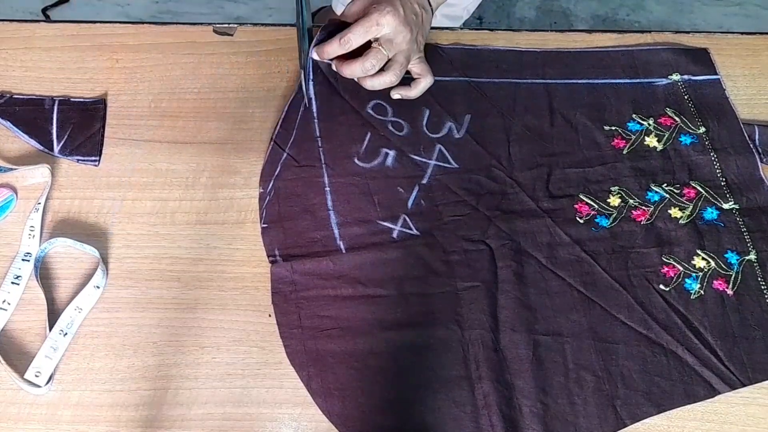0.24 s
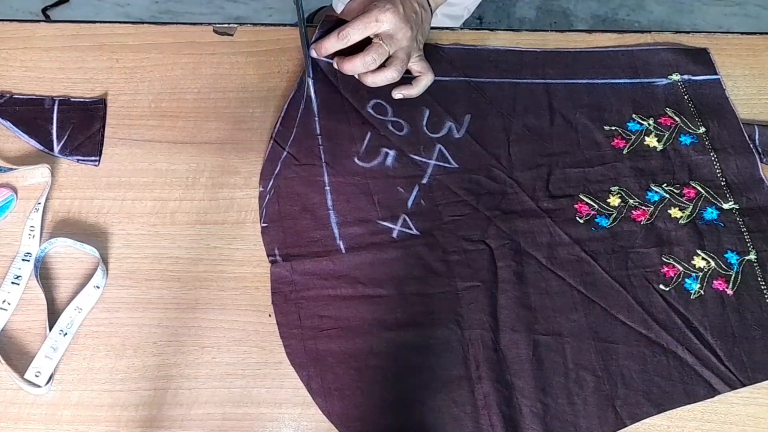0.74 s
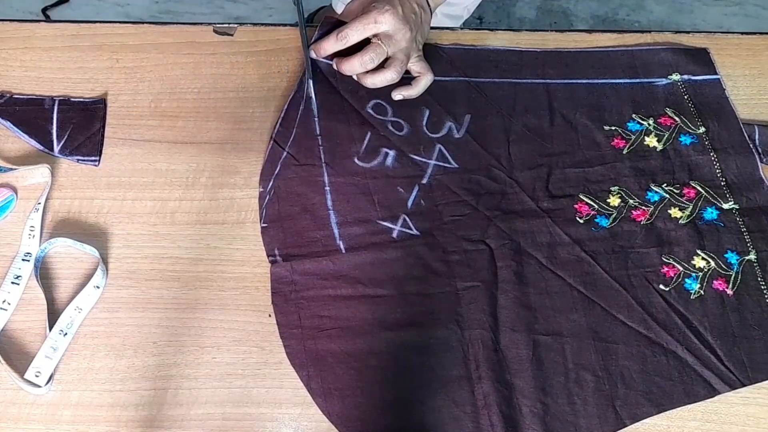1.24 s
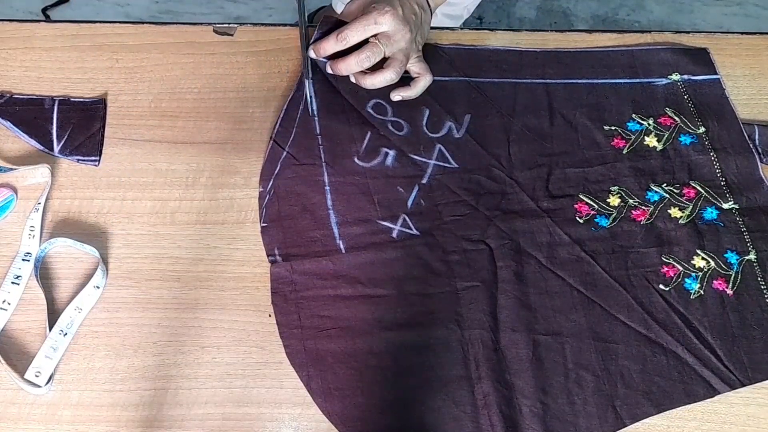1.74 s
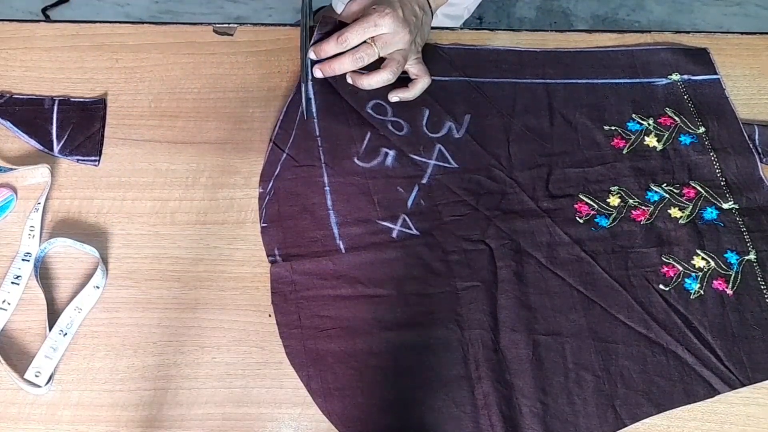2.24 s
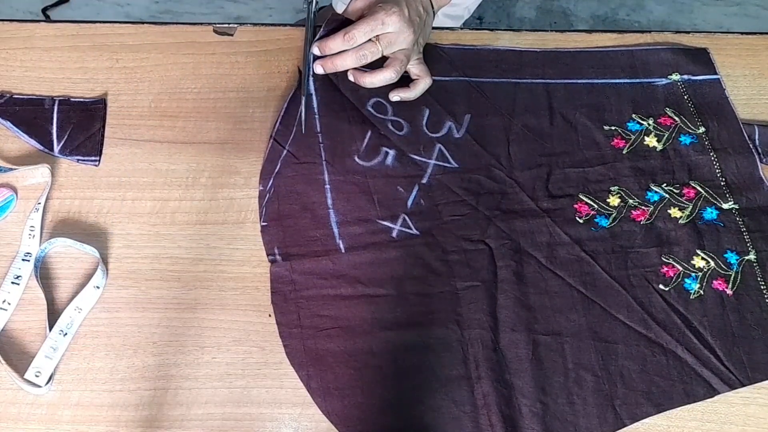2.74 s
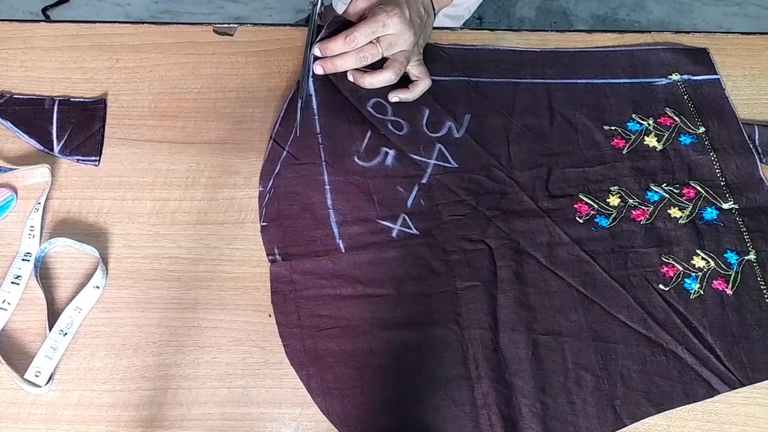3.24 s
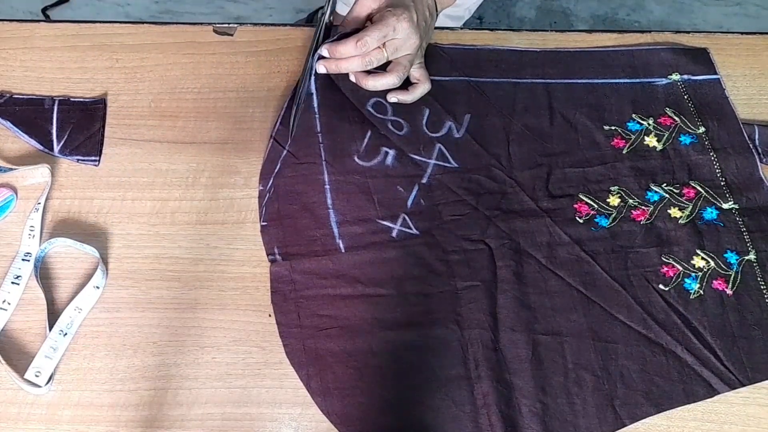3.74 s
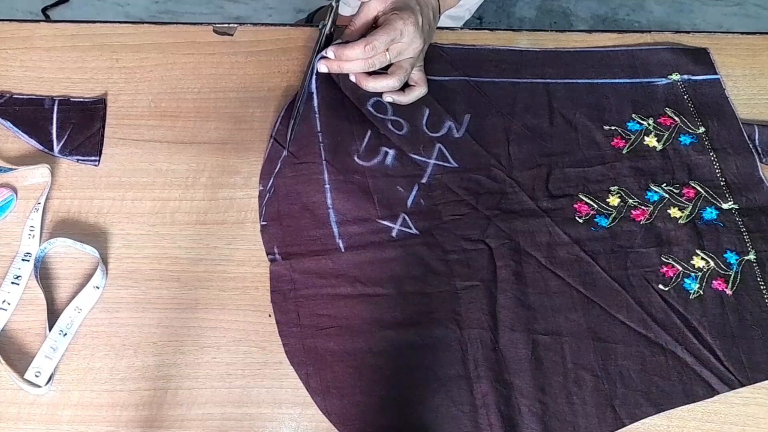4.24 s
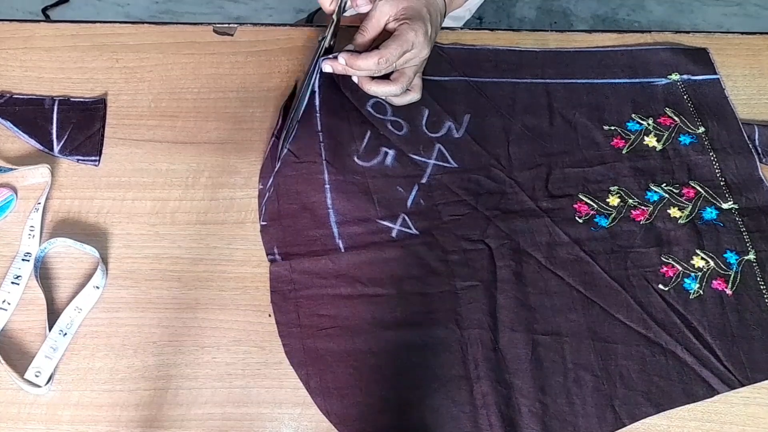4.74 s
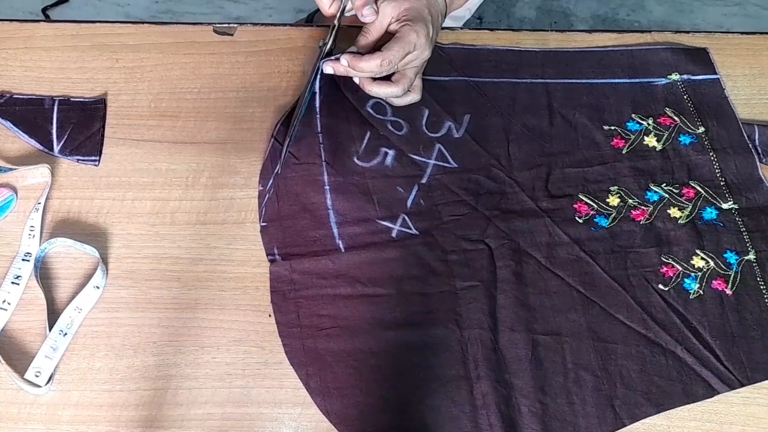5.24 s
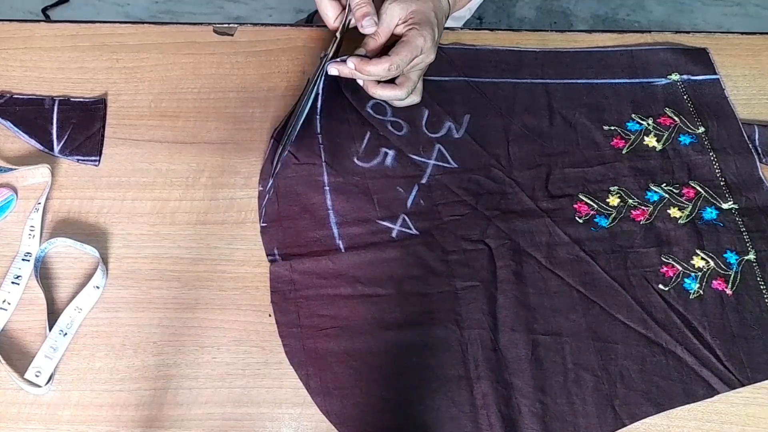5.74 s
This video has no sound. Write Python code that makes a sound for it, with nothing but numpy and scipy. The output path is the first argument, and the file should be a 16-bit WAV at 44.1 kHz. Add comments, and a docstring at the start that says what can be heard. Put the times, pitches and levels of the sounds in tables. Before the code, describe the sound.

A clatter on a wooden table dies away, then large tailor's scissors crunch through cloth in slow strokes, scraping and knocking the tabletop in a quiet room.

```python
"""A clatter on a wooden table dies away into room rumble, hum and hiss; a small bird chirps far off
and a clock ticks. Then large tailor's scissors cut cloth, the lower blade sliding on the table.
Clatter and hiss are shaped noise, the bird gliding sines, the clock paired noise bursts.
Each cut snaps a run of threads: random pulses drive resonances, so the table booms and the steel sizzles.
Between cuts the scissors reopen and scrape forward; knocks, bites and singing edges add the detail."""
import sys
import numpy as np
from scipy import signal
from scipy.fft import rfft, irfft
from scipy.io import wavfile
from scipy.ndimage import uniform_filter1d

SR = 44100
rng = np.random.default_rng(int(sys.argv[2]) if len(sys.argv) > 2 else 0)


def to_wav(sig):
    """Store sig (one row per channel, or 1-D mono) as 16-bit WAV at the path in sys.argv[1].

    Samples outside -1..1 are clipped; the rate is SR.
    """
    pcm = np.clip(np.atleast_2d(sig), -1, 1) * 32767
    pcm = np.round(pcm).astype(np.int16)
    wavfile.write(sys.argv[1], SR, pcm.T)  # frames by channels


N = 263718
TIME = np.arange(N) / SR

# All levels in the tables are relative: the sounds' own level settings still shift them.
# dying clatter on the table: (f/Hz, level/dB per Hz)
CLATTER_SPECTRUM = [(24, -47), (40, -33), (64, 0), (177, -11), (239, -5), (338, -10.5), (373, 2),
                    (478, -12.5), (627, -8), (845, -14.5), (1000, -10.5), (1290, -18.5), (1730, -17.5),
                    (2990, -29.5), (15000, -55)]
# room rumble and hiss: (f/Hz, level/dB per Hz)
HISS_SPECTRUM = [(12, -51), (20, -23), (53, -6.5), (95, -6.5), (119, -11), (149, -1), (197, -20.5),
                 (365, -14.5), (570, -23), (1650, -31), (3310, -39.5), (4500, -40), (5030, -39.5),
                 (11300, -36), (15800, -31)]
# steady hum in the room: (f/Hz, level/dB)
HUM_TONES = [(64.6, -87), (145.3, -75.5), (344.5, -88)]
# the bird's calls: (t/s, level/dB)
BIRD_CALLS = [(0.162, -57.5), (3.182, -59), (3.469, -55), (3.768, -57), (4.05, -56.5), (4.351, -54.5),
              (4.655, -58)]
# notes of every call: (t/s from its start, length/s, first f/Hz, last f/Hz, level/dB)
BIRD_NOTES = [(0, 0.035, 3820, 4070, -3.5), (0.028, .055, 5390, 5100, -0.5),
              (0.078, 0.038, 3673, 4230, -0.5), (0.11, 0.034, 4286, 4640, 0.5)]
# the clock's steps: (t/s, level/dB)
CLOCK_STEPS = [(0.767, -67), (1.765, -64), (2.736, -65), (3.739, -60.5), (4.746, -64), (5.74, -62)]
# colour of one click: (f/Hz, level/dB per Hz)
CLICK_SPECTRUM = [(1200, 6.5), (2400, 8), (3300, -3.5), (4500, 0), (6000, 1.5), (7100, 8), (8500, -15),
                  (12000, -10)]
# the scissors reopen and slide on: (t/s, length/s, rub of the cloth level/dB,
# lean on the table level/dB, rub of the edges level/dB)
SLIDES = [(1.095, 0.081, -58.5, 1, -99), (1.179, 0.14, -54.5, -6.5, -87), (1.42, 0.14, -49, -7.5, -71),
          (1.571, 0.14, -60, -4.5, -85), (1.8, 0.073, -58.5, 4, -78), (2.238, 0.062, -46, -4.5, -66),
          (2.38, 0.12, -50, 4.5, -73), (2.858, 0.14, -65, 6, -98), (3.085, 0.077, -58.5, -1, -74),
          (3.15, 0.053, -47.5, -12, -79), (3.653, 0.11, -50, 6, -70), (4.045, 0.11, -51.5, -3, -67),
          (4.445, 0.087, -56, 13.5, -80), (4.58, 0.11, -50, 3.5, -66.5), (5.101, 0.13, -48, 3, -67),
          (5.573, 0.1, -53.5, 8.5, -69), (5.945, .06, -65.5, 18, -88)]
# the blades close through the cloth: (t/s, length/s, starting force level/dB, swell/dB,
# lean on the table level/dB, keenness of the edges level/dB)
CUTS = [(1.68, 0.11, -45, 1.5, -3, -3.5), (1.886, 0.059, -42.5, -3.5, -0.5, -3.5),
        (2.008, 0.24, -40.5, 3, -2.5, 0), (3.229, 0.31, -44.5, 8.5, 0, 0.5), (4.156, 0.28, -41.5, 6, 3, 3),
        (5.208, 0.2, -40.5, 4, 2.5, 3.5)]
# further knocks of the blade on the table: (t/s, level/dB, favoured f/Hz)
KNOCKS = [(2.948, -43.5, 99), (3.307, -27.5, 1238), (3.487, -22, 424), (3.546, -26, 112), (4.383, -23, 370),
          (4.423, -17, 380), (4.432, -28, 97.6), (4.602, -33, 701), (5.113, -33.5, 535), (5.285, -23, 1100),
          (5.299, -24.5, 123), (5.376, -19, 388), (5.584, -44, 520)]
# the edges catch and bite: (t/s, level/dB, f/Hz at which the blades ring most)
BITES = [(1.701, -51, 6640), (1.894, -45, 14600), (2.021, -42.5, 13500), (2.068, -47, 14000),
         (2.123, -40, 12000), (2.208, -40, 14400), (2.2286, -37.5, 5500), (3.266, -44, 5420),
         (3.3109, -44, 14000), (3.3952, -41.5, 9750), (3.4456, -38.5, 9770), (3.486, -33.5, 5530),
         (4.1966, -43, 14420), (4.2192, -39, 12460), (4.287, -34.5, 12600), (4.3572, -41, 5520),
         (4.4229, -32.5, 5400), (5.115, -51.5, 6400), (5.153, -49, 13900), (5.2222, -41.5, 13400),
         (5.274, -34.5, 15000), (5.2974, -31.5, 14800), (5.3732, -33, 13800)]
# the blades rub steel on steel as they shut: (t/s, length/s, level/dB)
CLOSINGS = [(2.113, 0.18, -56.5), (3.476, 0.12, -58), (4.376, 0.068, -53.5), (5.366, 0.037, -50.5)]
# clear modes of the table top: (f/Hz, level/dB)
TABLE_MODES = [(113.0, -39), (199.2, -84), (242.2, -49), (328.4, -45.5), (376.8, -36), (511.4, -43),
               (646.0, -58), (812.9, -47), (861.3, -46), (915.2, -50), (1001, -78), (1136, -45.5),
               (1233, -58), (1389, -93), (1572, -90)]
# dense modes of the table top: (f/Hz, level/dB per Hz)
WOOD_SPECTRUM = [(40, -25), (75, 0.5), (110, 4.5), (150, -2), (195, -30.5), (245, -2.5), (290, -17.5),
                 (380, -10), (520, -3), (600, -12.5), (820, -8.5), (1250, -6), (1640, -20.5), (1870, -37),
                 (5000, -49)]
# dense modes of the blades: (f/Hz, level/dB per Hz)
STEEL_SPECTRUM = [(2200, -41), (3200, -12), (4000, -17), (4800, -1), (6500, 4), (7500, 0.5), (8400, -32),
                  (9800, -6), (11500, 4.5), (13800, 6.5), (15000, 6), (15800, -2.5)]
# clear modes of the blades: (f/Hz, width/Hz before stroke() broadens it, level/dB)
BLADE_MODES = [(5530, 50, 6), (5900, 33, -3), (6450, 28, 7.5), (9750, 280, 4), (10330, 210, 7),
               (12900, 52, -24), (12900, 51, -11), (14200, 790, -15), (14900, 86, -33.5)]
# modes of the shut blades: (f/Hz, width/Hz, level/dB)
SHUT_MODES = [(5540, 70, 6), (5710, 89, -0.5), (7360, 370, -4.5), (10800, 200, -3.5), (14100, 370, -1)]
# tearing fibres: (f/Hz, level/dB per Hz)
FIBRE_SPECTRUM = [(1100, -6.5), (1550, 7), (2100, 0), (2700, -5), (3200, -8.5), (3900, -21.5),
                  (6000, -22.5)]
# reverberation of the room: (f/Hz, decay by 60 dB t/s)
ROOM_DECAY = [(100, 0.59), (400, 0.57), (1200, 0.47), (4500, 0.58), (8000, 0.42), (15000, 0.39)]
# likeness of left and right, wide around 3 to 5 kHz, nearly mono above 7 kHz: (f/Hz, likeness from -1 to 1)
LIKENESS = [(30, .5), (70, .9), (150, .94), (300, .87), (640, .68), (1400, .38), (3100, .2), (5300, .25),
            (7000, .8), (10000, .9), (15000, .9)]
# likeness of left and right in the background, wide below 5 kHz, nearly mono in the treble:
# (f/Hz, likeness from -1 to 1)
BACKGROUND_LIKENESS = [(30, .4), (120, .45), (300, .15), (1000, 0), (5000, 0), (7000, .6), (9000, .95),
                       (15000, .97)]
# phase by which left leads right: (f/Hz, phase/rad)
LEFT_LEAD = [(0, .1), (1200, .2), (2500, .4), (4500, 1.2), (6400, 0), (15500, 0)]

# during a cut, levels against the crunch: (dB at the start, dB at the end)
CUT_SCRAPE_DB, CUT_WEIGHT_DB, CUT_SIZZLE_DB = (-5, 0.5), (-4.5, 0), (-20, -15.5)
CUT_ATTACK_S, CUT_RELEASE_S = 0.026, 0.019
SLIDE_ATTACK_S, SLIDE_RELEASE_S = 0.038, 0.033


def amp(db):
    """Decibels to gain."""
    return 10 ** (np.asarray(db) / 20)


def evened(x):
    """Scales to rms 1."""
    return x / np.sqrt(np.mean(x ** 2) + 1e-20)


def unit(h):
    """Scales a response to a mean energy of 1 per channel."""
    return evened(h) / np.sqrt(h.shape[-1])


def read(points, hz):
    """Reads a table on a log-frequency axis."""
    f, value = np.transpose(points)
    return np.interp(np.log(hz + 1), np.log(f + 1), value)


def add(mix, s, sound):
    """Mixes a sound in at time s."""
    part = mix[..., max(round(s * SR), 0):][..., :sound.shape[-1]]
    part += sound[..., :part.shape[-1]]


def through(x, response):
    """Sends a sound through a response by convolution."""
    return signal.fftconvolve(np.atleast_2d(x), response, axes=1)[:, :N]


def band(x, hz, kind, order=2):
    """Butterworth filter."""
    return signal.sosfilt(signal.butter(order, hz, kind, fs=SR, output="sos"), x)


def noise_pair(spectrum, size, likeness=LIKENESS):
    """Coloured stereo noise of rms 1."""
    hz = np.fft.rfftfreq(size, 1 / SR)
    left, other = rfft(rng.standard_normal((2, size)))
    same = np.clip(read(likeness, hz), -1, 1)
    right = same * left + np.sqrt(1 - same ** 2) * other
    right = right * np.exp(-1j * read(LEFT_LEAD, hz))
    return evened(irfft(np.array([left, right]) * amp(read(spectrum, hz)), size))


def burst(spectrum, t60, size=16384):
    """A dying burst of dense, unresolved modes whose strengths follow the spectrum."""
    decay = amp(-60 * np.arange(size) / SR / t60)
    z = rfft(noise_pair([(20, 0), (20000, 0)], size) * decay)
    # level the broad colour of the noise, but keep its fine grain of modes
    grain_bins = max(int(4 / t60 * size / SR), 3)
    local = np.sqrt(uniform_filter1d((abs(z) ** 2).mean(0), size=grain_bins))
    z *= amp(read(spectrum, np.fft.rfftfreq(size, 1 / SR))) / local
    fade_out = np.minimum(np.linspace(2, 0, size), 1) ** 4
    return unit(irfft(z) * fade_out)


def ring(modes, size=16384):
    """Damped sines from rows (f/Hz, width/Hz, level/dB), out of step where left and right are unlike."""
    t, out = np.arange(size) / SR, np.zeros((2, size))
    for k, (hz, width, db) in enumerate(modes):
        lag = (-1) ** k * np.arccos(np.clip(read(LIKENESS, hz), -1, 1))
        sine = np.sin(2 * np.pi * hz * t - np.array([[0], [lag]]))
        out += amp(db) * unit(sine * np.exp(-np.pi * width * t))
    return unit(out)


def room(x, build_s=0.0009):
    """A dense noise tail in which each band dies at its own speed."""
    noise = noise_pair([(20, 0.0054), (20000, 0)], SR)
    hz, t, z = signal.stft(noise, SR, nperseg=256)
    decay = amp(-60 * t / read(ROOM_DECAY, hz)[:, None])
    tail = signal.istft(z * decay * (1 - np.exp(-t / build_s)), SR, nperseg=256)[1]
    return through(x, unit(tail))


def clatter(level_db=-26.5, t60=0.41):
    """The last of a clatter on the table: shaped noise that dies away exponentially."""
    ease_in = np.minimum(TIME / 0.002, 1)
    return ease_in * amp(level_db - 60 * TIME / t60) * noise_pair(CLATTER_SPECTRUM, N)


def background(hum_db=-1, hiss_db=-62, waver_hz=7):
    """Room rumble and fine hiss as shaped noise, with hum tones that waver in level and phase."""
    def waver():
        return evened(band(rng.standard_normal(N), waver_hz, "low"))

    hum = np.zeros(N)
    for hz, db in HUM_TONES:
        swell = 1 + 0.22 * waver()
        hum += amp(db) * swell * evened(np.sin(2 * np.pi * hz * TIME + 1.5 * waver()))
    return amp(hum_db) * hum + amp(hiss_db) * noise_pair(HISS_SPECTRUM, N, BACKGROUND_LIKENESS)


def bird(level_db=-3, stray=0.0102, warble=0.037, warble_hz=280):
    """Thin whistled notes: gliding sines, unevenly detuned and warbled, heard only as reverberation."""
    out = np.zeros(N)
    for start, db in BIRD_CALLS:
        for delay, length, first_hz, last_hz, note_db in BIRD_NOTES:
            size = round(length * SR)
            waver = evened(band(rng.standard_normal(SR), warble_hz, "low"))[:size]
            # stray and warble are shares of the pitch
            bend = 1 + stray * rng.standard_normal() + warble * waver
            hz = np.linspace(first_hz, last_hz, size) * bend
            whistle = np.sin(2 * np.pi * np.cumsum(hz) / SR)
            note = evened(whistle * signal.windows.tukey(size, 0.5))
            add(out, start + delay, amp(db + level_db + note_db) * note)
    return room(out)


def clock(second_click_s=0.04, level_db=-2, first_db=-3, direct_db=-12):
    """Each step of a distant clock is a soft double click, mostly reverberation."""
    out = np.zeros((2, N))
    for s, db in CLOCK_STEPS:
        for delay, click_db in ((0, first_db), (second_click_s, 0)):
            click = evened(burst(CLICK_SPECTRUM, 0.025, size=2048))
            add(out, s + delay, amp(db + level_db + click_db) * click)
    return amp(direct_db) * out + room(out)


def threads(size, per_s=620, spread_db=3.5, rub=0.45):
    """Threads part one by one in uneven snaps over a little smooth rubbing."""
    rate = per_s * rng.exponential(1, size // 64 + 1).repeat(64)[:size]
    count = np.cumsum(rate) / SR
    snaps = np.diff(np.floor(count), prepend=0)
    snaps = snaps * amp(spread_db * rng.standard_normal(size)) * rng.choice([-1, 1], size)
    force = evened(snaps) + rub * rng.standard_normal(size)
    # the hand keeps the effort steady
    return force / np.sqrt(uniform_filter1d(force ** 2, size=1100) + 1e-9)


def table_top(width_hz=18, modes_db=-4, dense_t60=0.066, spot_db=-0.9):
    """The wooden top's answer to a tap: clear modes among dense ones, varied at random for each spot."""
    modes = [(hz, width_hz + hz / 50, db + spot_db * rng.standard_normal()) for hz, db in TABLE_MODES]
    return unit(amp(modes_db) * ring(modes) + burst(WOOD_SPECTRUM, dense_t60))


def push(start, length, attack_s, release_s):
    """One push of the hand: progress from 0 to 1, and an envelope that eases in, holds and dies away."""
    t = np.arange(0, min(length + 6 * release_s, N / SR - start), 1 / SR)
    attack = np.sin(np.pi / 2 * np.minimum(t / attack_s, 1)) ** 2
    return np.minimum(t / length, 1), attack * np.exp(-np.maximum(t - length, 0) / release_s)


def stroke(crunch, scrape, sizzle, weight, low_hz=190, mid_hz=600, crunch_db=-1, scrape_db=-1.5,
           weight_db=-1, tear_db=-3, sizzle_db=-4, ring_db=-3, flutter_db=5.0, flutter_hz=36):
    """Thread snaps shake the table through the lower blade and ring the steel itself."""
    size = len(crunch)
    top, snaps = table_top(), threads(size)
    # the table's high, middle and low modes each follow their own envelope
    high_top = unit(band(top, mid_hz, "high", order=4))
    mid_top = unit(band(top, [low_hz, mid_hz], "band", order=4))
    low_top = unit(band(top, low_hz, "low", order=4))
    wood = amp(crunch_db) * through(snaps * crunch, high_top)
    wood += amp(scrape_db) * through(snaps * scrape, mid_top)
    wood += amp(weight_db) * through(snaps * weight, low_top)
    # fibres tear brightly only while the edges are really cutting
    tear = amp(tear_db) * through(snaps * np.sqrt(crunch * sizzle), burst(FIBRE_SPECTRUM, 0.067))
    # the cloth feeds into the edges in small jerks
    jerks = evened(band(rng.standard_normal(size), flutter_hz, "low"))
    flutter = evened(amp(flutter_db * jerks))
    grind = evened(snaps + 0.5 * rng.standard_normal(size))
    edges = amp(sizzle_db) * grind * sizzle * flutter
    # broader modes die away sooner
    broadened = [(hz, width + 40, db) for hz, width, db in BLADE_MODES]
    blades = unit(burst(STEEL_SPECTRUM, 0.06) + amp(ring_db) * ring(broadened))
    return wood + tear + through(edges, blades)


def slide(start, length, rub_db, lean_db, edges_db, fade_db=-2, weight_db=-5.5):
    """A soft shove that slows down: the lower blade scrapes the wood under the cloth."""
    progress, envelope = push(start, length, SLIDE_ATTACK_S, SLIDE_RELEASE_S)
    speed = envelope * amp(fade_db * progress)
    scrape = speed * amp(rub_db + lean_db)
    return stroke(speed * amp(rub_db), scrape, speed * amp(edges_db), scrape * amp(weight_db))


def cut(start, length, force_db, swell_db, lean_db, keen_db):
    """The force swells or eases as the blades close, while table and steel gain on the crunch."""
    closed, envelope = push(start, length, CUT_ATTACK_S, CUT_RELEASE_S)
    crunch = envelope * amp(force_db + swell_db * closed)
    scrape = crunch * amp(np.interp(closed, [0, 1], CUT_SCRAPE_DB) + lean_db)
    sizzle = crunch * amp(np.interp(closed, [0, 1], CUT_SIZZLE_DB) + keen_db)
    weight = crunch * amp(np.interp(closed, [0, 1], CUT_WEIGHT_DB) + lean_db)
    return stroke(crunch, scrape, sizzle, weight)


def knocks(level_db=-3, touch_s=0.0027, chatter_s=0.0098, landing_db=9.5, landing_hz=1200):
    """The blade chatters briefly as it lands, and each blow favours one band of the table's modes."""
    out, top, t = np.zeros((2, N)), table_top(), np.arange(1500) / SR
    # the lower blade also lands at the start of every cut, at a level set by the cut's force
    landings = [(s + CUT_ATTACK_S / 2, force_db + landing_db, landing_hz) for s, _, force_db, *_ in CUTS]
    for s, db, hz in landings + KNOCKS:
        chatter = threads(len(t)) * (1 - np.exp(-t / touch_s)) * np.exp(-t / chatter_s)
        blow = band(through(chatter, top), [hz / 1.203, hz * 1.195], "band")
        add(out, s - 0.002, amp(db + level_db) * blow / abs(blow).max())
    return out


def bites(level_db=-1, touch_s=0.0051, fade_s=0.015, ring_db=1, width_hz=450, threads_per_s=900):
    """A bundle of threads gives way at once; each place along the edge favours another blade mode."""
    out, t = np.zeros((2, N)), np.arange(4000) / SR
    for s, db, hz in BITES:
        mode = ring([(hz, width_hz, 0)], size=2048)
        blades = unit(burst(STEEL_SPECTRUM, 0.0028, size=2048) + amp(ring_db) * mode)
        bundle = threads(len(t), threads_per_s) * (1 - np.exp(-t / touch_s)) * np.exp(-t / fade_s)
        snip = through(bundle, blades)
        add(out, s - 0.003, amp(db + level_db) * snip / abs(snip).max())
    return out


def closings():
    """The bare edges grind together as the blades shut, and the steel sings briefly."""
    out = np.zeros((2, N))
    for s, length, db in CLOSINGS:
        size = round(length * SR)
        grind = threads(size) * signal.windows.tukey(size, 0.4)
        add(out, s, amp(db) * through(grind, ring(SHUT_MODES, size=4096)))
    return out


def scissors():
    """All slides and cuts, with their knocks, bites and closings."""
    out = knocks() + bites() + closings()
    for row in SLIDES:
        add(out, row[0], slide(*row))
    for row in CUTS:
        add(out, row[0], cut(*row))
    return band(out, 63.0, "high", order=4)  # little deep bass remains below about 60 Hz


def scene(room_db=-8, left_db=-1.56, right_db=-0.14):
    """The scissors close by with some room, the rest behind; the whole mix leans a little to the right."""
    near = scissors()
    mix = clatter() + background() + bird() + clock() + near + amp(room_db) * room(near)
    return mix * amp([[left_db], [right_db]])


def record(dry, edge_hz=15820):
    """The recorder's band limit: a steep low-pass."""
    low_pass = signal.firwin(1501, edge_hz, window=("kaiser", 9), fs=SR)
    return signal.oaconvolve(dry, low_pass[None], "same")


dry = scene()
out = record(dry)
to_wav(out)
```